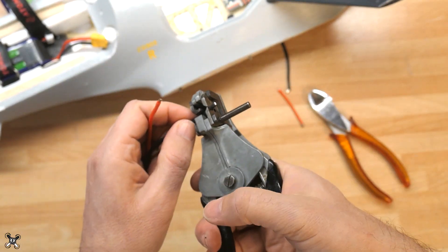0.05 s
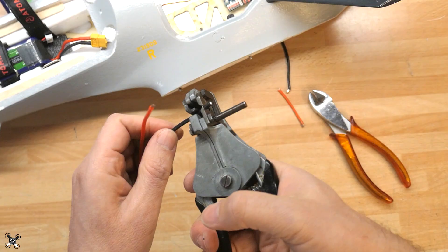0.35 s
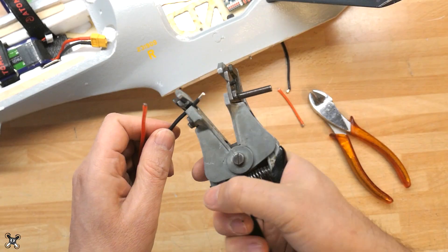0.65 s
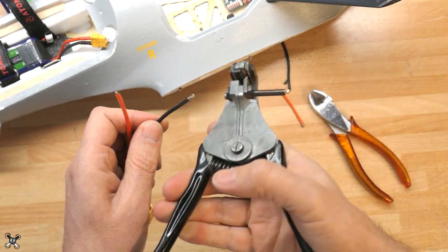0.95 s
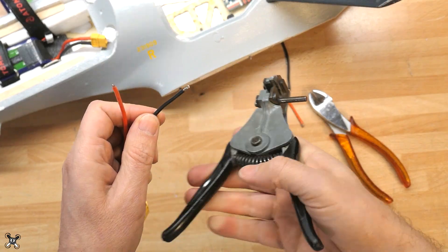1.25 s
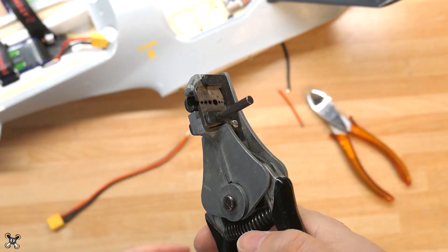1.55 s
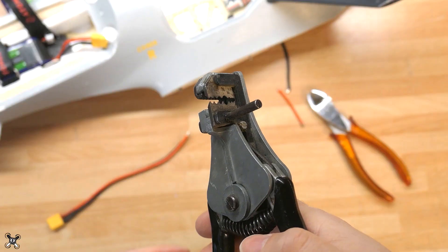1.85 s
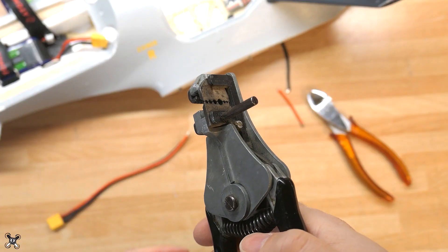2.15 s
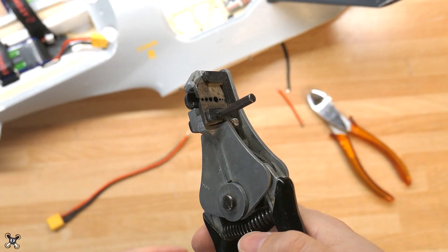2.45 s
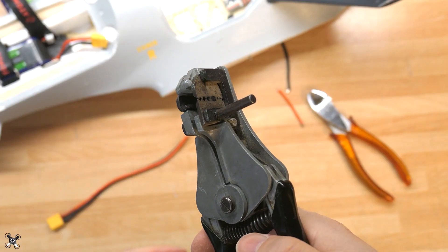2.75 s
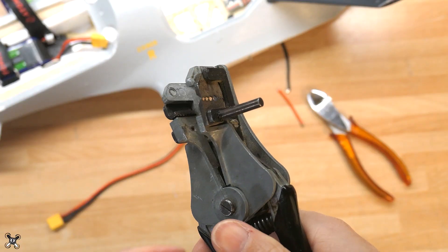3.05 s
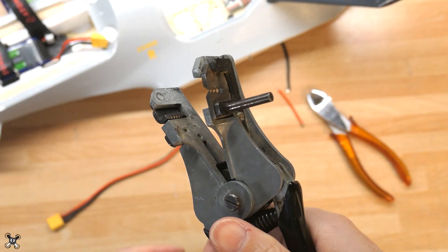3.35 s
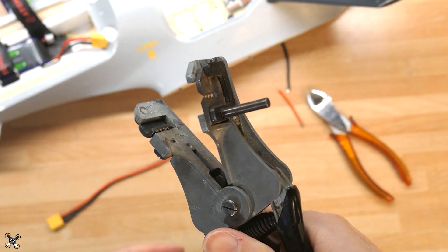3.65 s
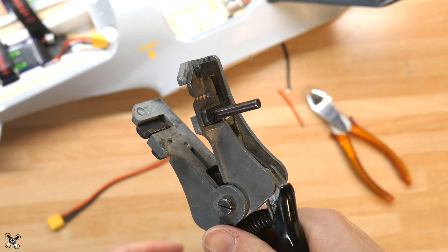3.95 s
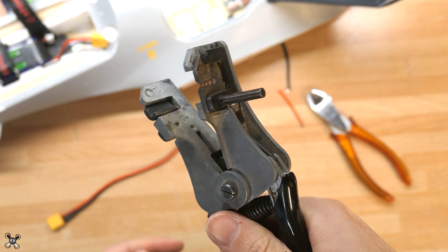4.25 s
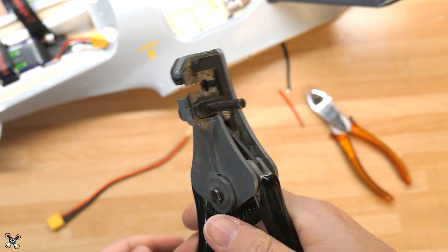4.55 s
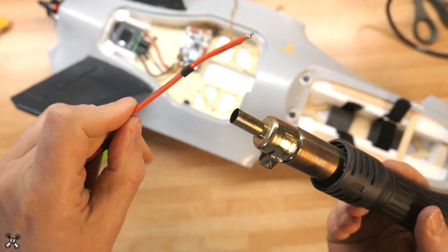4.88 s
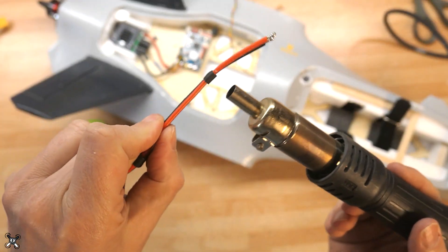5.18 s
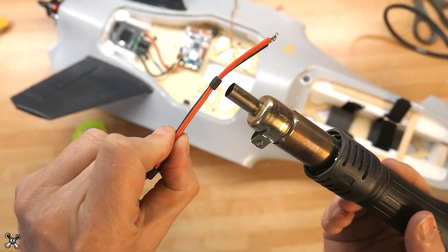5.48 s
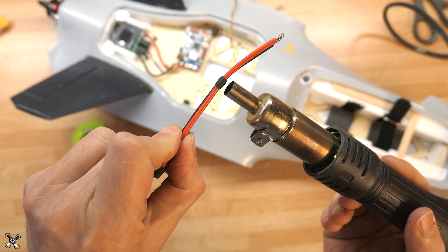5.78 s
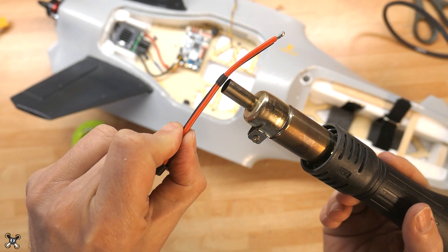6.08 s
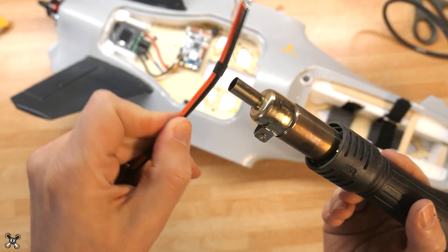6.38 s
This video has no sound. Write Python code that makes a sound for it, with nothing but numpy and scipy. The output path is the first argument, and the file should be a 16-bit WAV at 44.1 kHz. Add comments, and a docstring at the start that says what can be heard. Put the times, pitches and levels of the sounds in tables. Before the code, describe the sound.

A faint fan hums in a small workshop. At about 0.5 seconds a steel automatic wire stripper clicks close by as it grips a wire, then scrapes and cracks open with the loudest snap at 0.9 seconds. Light rattles and soft handle knocks follow between 1.2 and 1.7 seconds, with a few small clicks just after 2 seconds. A bright clink comes at 3.4 seconds, then quiet pivot ticks and a faint spring creak as the handles are squeezed. Around 4.4 and 4.6 seconds the tool lets go and springs shut in two sharp metallic clacks with a slight twang. At about 4.8 seconds the sound changes abruptly to a small heat gun, blowing a steady, hollow rush of air with faint thin whistles until the end, at around 6.6 seconds.

```python
"""A workshop with a wooden bench; a fan hums in the background. A steel automatic wire stripper grips,
scrapes, snaps open and springs shut: steel blows crack and ring, sliding faces stick and slip, the return
spring creaks and twangs. A gain control ducks the sound after the hardest snaps.
Then the scene changes: a small heat gun blows steadily on a heat-shrink sleeve, its jet rushing through
the barrel's resonances, with thin whistles from the nozzle."""
import sys
import numpy as np
from scipy import signal
from scipy.fft import rfft, irfft, next_fast_len
from scipy.io import wavfile
from scipy.ndimage import uniform_filter1d, minimum_filter1d, map_coordinates

SR = 44100
rng = np.random.default_rng(int(sys.argv[2]) if len(sys.argv) > 2 else 0)


def digitize_waveform(pressure):
    """Quantize a signal to 16-bit integers and store it at the path in sys.argv[1].

    Rows of a 2-D input are taken as channels; values are limited to [-1, 1].
    """
    field = np.atleast_2d(pressure).T
    bounded = np.clip(field, -1, 1)
    quanta = np.round(bounded * 32767).astype(np.int16)
    wavfile.write(sys.argv[1], SR, quanta)


N = 292054
SCENE_CHANGE_S = 4.763

# fan air noise (frequency [Hz], relative density [dB])
FAN_SPECTRUM = [(18, -63), (30, -24), (274, -3), (296, -6.5), (567, -8), (645, -0.5), (1270, -9),
                (2250, -17.5), (3230, -20), (12200, -20), (15000, -43)]
# fan stereo width (frequency [Hz], side re mid [dB])
FAN_WIDTH = [(60, 0), (110, 14), (200, 9.5), (380, 9.5), (700, 3.5), (1290, 4), (2380, 3.5), (4400, -3),
             (8120, -4.5), (15000, -7.5)]
# fan housing resonances (centre [Hz], width [Hz], boost [dB])
HOUSING_PEAKS = [(302, 8.9, 13), (438, 125, 1.5), (622, 42, 4.5), (733, 65, 2.5), (786, 45, -7),
                 (1053, 55, 9.5), (1208, 290, -4), (1620, 29, 6)]

# heat gun jet noise (frequency [Hz], relative density [dB])
JET_SPECTRUM = [(18, -74), (30, -43), (147, -20.5), (234, -18), (304, -6.5), (374, -9), (538, 0.5),
                (794, -8), (1370, -10), (1830, -15.5), (1970, -13), (3320, -13), (3880, -18.5),
                (9640, -25.5), (15000, -43)]
# jet stereo width (frequency [Hz], side re mid [dB])
JET_WIDTH = [(60, 17), (110, -6), (200, 9), (380, -6.5), (700, -6), (1290, -8.5), (2380, -9.5), (4400, -11),
             (8120, -10), (15000, -1)]
# heat gun balance (frequency [Hz], left re right [dB])
GUN_BALANCE = [(60, -1.5), (110, 4.5), (200, -4), (380, -2.5), (700, 0.5), (1290, 2), (2380, 2),
               (4400, 2.5), (8120, 0.5), (15000, 1)]
# barrel and nozzle resonances (centre [Hz], width [Hz], boost [dB])
BARREL_PEAKS = [(166.5, 31, 5), (305, 21, 3), (539, 17, 5.5), (570, 17, -3), (612, 25, 7), (682, 74, 3.5),
                (924, 20, 6), (1074, 20, 4), (1410, 235, 6.5), (2514, 18, 6.5), (2785, 140, 5.5),
                (3260, 55, 4), (3440, 290, 4.5), (4330, 90, 3), (5240, 570, -2.5), (6000, 1140, 4.5),
                (7200, 510, 2), (8100, 590, -3), (9600, 500, 1.5)]
# uneven level of the jet noise around 570 Hz (time [s], relative level [dB])
JET_BAND_LEVEL = [(4.78, -43.5), (4.814, -42.5), (4.944, -51), (5.0, -40.5), (5.04, -50.5), (5.096, -37),
                  (5.132, -54), (5.174, -37), (5.22, -50), (5.272, -39.5), (5.292, -46), (5.348, -42),
                  (5.374, -48), (5.446, -40.5), (5.542, -51), (5.574, -41.5), (5.716, -45.5), (6.28, -42.5),
                  (6.296, -44), (6.45, -47), (6.47, -49.5), (6.548, -44), (6.568, -42.5), (6.62, -45)]
# nozzle whistles (frequency [Hz], relative level [dB])
NOZZLE_WHISTLES = [(1233, -59), (1696, -55.5), (1852, -53)]
# whistle pitch creep (time [s], offset [cents])
WHISTLE_BEND = [(4.8, 1), (4.9, -2), (5.75, -2.5), (6.6, 10.5)]

# workshop reverb decay (frequency [Hz], t60 [s])
ROOM_DECAY = [(200, 0.3), (1200, 0.43), (2500, 0.48), (6500, 0.45), (10000, 0.4), (15000, 0.19)]
# workshop reverb colour (frequency [Hz], relative level [dB])
ROOM_SPECTRUM = [(200, -3), (700, -21), (1400, -5), (2300, 1), (6500, 0.2), (15000, 2.5)]

# spring rubbing under load (start [s], end [s], level [dB])
SPRING_CREAKS = [(0.803, 0.864, -61), (3.899, 4.172, -69)]
# return spring mode clusters (centre [Hz], relative level [dB])
SPRING_MODES = [(2400, -9), (2650, -2), (4470, 1), (4660, -1), (6030, 4), (6850, 1)]
# jolts of the spring (time [s], level [dB])
SPRING_TWANGS = [(4.383, -57), (4.5557, -54)]
# spring and pivot ticks (time [s], relative level [dB], ping [Hz], treble sheen [dB])
PIVOT_TICKS = [(0.6794, -42, 2200, -17), (2.505, -57, 2230, -17), (3.299, -54, 6060, 4),
               (3.4958, -49.5, 1900, -19), (3.5426, -44, 2120, -8), (3.606, -50, 1910, -16),
               (3.8984, -48.5, 2350, -14), (3.939, -52, 2500, -18), (3.997, -45.5, 2250, -8),
               (4.061, -50, 2380, -14), (4.089, -48.5, 2230, -17), (4.21, -51, 2400, 0)]
# handles shifting in the hand (time [s], level [dB], pitch [Hz])
HANDLE_KNOCKS = [(1.247, -53, 900), (1.301, -59.5, 1570), (1.4196, -56, 900), (1.421, -58, 1740),
                 (3.651, -60, 830), (3.71, -59, 930), (3.945, -60.5, 880), (4.105, -60, 760),
                 (4.193, -59.5, 970)]
# handles stopping on the palm (time [s], level [dB], push [Hz], push t60 [s], clack re push [dB])
PALM_THUMPS = [(0.5256, -33.5, 344, 0.023, -20), (0.528, -38, 463, 0.027, -20),
               (0.9225, -13, 344, 0.014, 9), (4.384, -41, 229, .028, 10), (4.5567, -35, 218, 0.037, 15)]
# gripping jaw modes (frequency [Hz], relative level [dB], t60 [s])
GRIPPER_MODES = [(1250, -20, .02), (2410, -8, .02), (3050, -13, .02), (5620, -3, .024), (8860, -7, .025),
                 (9850, -3, .025), (10450, -2, .025), (12700, -7, .02), (14500, -7, .02)]
# gripping jaw dropping onto its seat (time [s], level [dB])
GRIPPER_CLINKS = [(0.58, -27), (1.4522, -35), (3.365, -27.5)]
# broad jaw resonances (centre [Hz], width [Hz], boost [dB])
JAW_PEAKS = [(2390, 410, 1.5), (4060, 160, 6), (4490, 117, -2.5), (5470, 950, 3), (6570, 710, 2.5),
             (7800, 430, -0.5), (10150, 1100, 3)]
# steel frame mode clusters (centre [Hz], relative level [dB])
FRAME_MODES = [(1797, -14), (2400, -15), (2920, -7), (3980, -1.5), (4520, -9.5), (5650, -3.5), (6220, -13),
               (6800, -1.5), (7300, 6), (9100, 4.5), (10400, -2), (12600, -19), (14200, -15)]
# sliding steel noise (frequency [Hz], relative level [dB])
SCRAPE_SPECTRUM = [(60, -42), (300, -28), (1300, -11), (2300, -1), (4000, -9), (6500, -0.5), (8500, -6),
                   (15000, -5)]
# steel sliding to a stop (start [s], length [s], relative level [dB])
JAW_SCRAPES = [(0.517, 0.022, -42.5), (0.853, 0.041, -32.5), (0.914, 0.012, -17), (1.46, 0.044, -51),
               (1.613, 0.069, -50.5), (2.105, 0.048, -50.5), (4.3445, 0.033, -32), (4.543, 0.016, -16),
               (4.562, 0.018, -27)]
# steel on steel: grip, part, tear off the insulation, rattle, squeeze, let go, spring shut
# (time [s], level [dB], low knock [dB], treble sheen [dB], ping [Hz], ping re crack [dB], ping t60 [s])
JAW_BLOWS = [ (0.5226, -38.5, -7, -10, 6000, -15, .02), (0.5266, -36.5, -4, -12, 3400, -7, 0.023),
             (0.5427, -33.5, -14, -7, 9300, -5, 0.022), (.5803, -23.5, -19.5, 0.5, 2660, -15.5, 0.013),
             (0.8585, -28, -10, -3, 7500, -7, .015), (.862, -22.5, -16, -5, 7130, -1, 0.0074),
             (0.8793, -15.5, -24.5, -6, 5400, -17, .015), (.913, -22, -29, -7, 7300, 2, .015),
             (0.916, -14.5, -30, -17, 7290, -9, 0.016), (0.9224, -4.5, -10.5, -6, 7420, -15, .014),
             (1.4511, -29, -34, -7.5, 4670, -12, 0.014), (1.5094, -39.5, -9, -6.5, 12700, -8, .04),
             (1.5487, -36.5, -14, -2.5, 9140, 1.5, 0.036), (1.6108, -40, -28, -6, 6700, -6, .02),
             (1.6194, -38.5, -8, -4, 5870, 0.5, 0.019), (1.6989, -39, -17, -10.5, 6400, -23, .015),
             (2.079, -55, -10.5, -9, 6860, -13, .03), (2.128, -46, -6, -8, 6900, -7, 0.022),
             (2.138, -40.5, -8, -2, 7250, -10, .015), (2.2427, -52, -4, -14, 4840, -11, .015),
             (2.255, -52, -2.5, -14, 4700, -8, .015), (3.3641, -26, -16.5, 6.5, 5840, -7.5, 0.017),
             (4.3323, -43, 0, -3, 5970, -2, 0.048), (4.3503, -23.5, -7.5, 0, 2100, -8.5, 0.013),
             (4.365, -26, -22, 1, 12730, -8, .02), (4.3836, -16.5, -18, -2, 5900, -16, 0.012),
             (4.545, -23.5, -14, 3, 6500, -5, .02), (4.5482, -23, -17, -1, 6500, -1, .02),
             (4.5554, -9, -12.5, -2, 6640, -12, 0.018)]


def amp(db):
    """Decibels to gain."""
    return 10 ** (np.asarray(db) / 20)


def unit(x):
    """Scale to rms 1."""
    return x / np.sqrt(np.mean(x ** 2) + 1e-20)


def along(points, hz):
    """Interpolate (frequency [Hz], value) points on a log axis."""
    knots_hz, values = np.transpose(points)
    return np.interp(np.log(hz + 1), np.log(knots_hz + 1), values)


def curve(points):
    """Interpolate (time [s], value) points per sample."""
    return np.interp(np.arange(N) / SR, *np.transpose(points))


def bells(peaks, hz):
    """Sum of bell-shaped resonances."""
    return sum(height / (1 + (2 * (hz - centre) / width) ** 2) for centre, width, height in peaks)


def wobble(rate_hz):
    """Smooth random curve."""
    knots = rng.standard_normal(int(N * rate_hz / SR) + 4)
    return map_coordinates(knots, [np.arange(N) * rate_hz / SR])


def filtered(x, response):
    """Apply a frequency response."""
    n = x.shape[-1]
    size = next_fast_len(n + SR // 10)
    return irfft(rfft(x, size) * response(np.fft.rfftfreq(size, 1 / SR)), size)[..., :n]


def cluster(modes, width_hz, t60_s, t):
    """Close modes beating into a rough ring, energy 1."""
    peaks = [(hz, width_hz, amp(db)) for hz, db in modes]
    ring = filtered(rng.standard_normal(len(t)), lambda hz: bells(peaks, hz)) * amp(-60 * t / t60_s)
    return ring / np.linalg.norm(ring)


def air_noise(spectrum, peaks, width):
    """Stereo rush of air through resonances, mid at rms 1."""
    colour = lambda hz: amp(along(spectrum, hz) + bells(peaks, hz))
    mid, side = (unit(filtered(rng.standard_normal(N), colour)) for _ in range(2))
    side = filtered(side, lambda hz: amp(along(width, hz)))
    return np.array([mid + side, mid - side])


def air_tones(lines, drift_hz, flutter_db, glide=1):
    """Air-driven tones wavering in pitch and level."""
    waver = lambda hz: np.sin(2 * np.pi * np.cumsum(hz * glide + drift_hz * wobble(40)) / SR)
    return np.sqrt(2) * sum(amp(db + flutter_db * wobble(13)) * waver(hz) for hz, db in lines)


def fan(air_db=-60.5, waver_db=0.5, hum_hz=242, hum_db=-71, hold_s=0.78, fade_db_per_s=16):
    """Distant fan: air noise in a resonant housing, over a low hum that fades early."""
    air = amp(air_db + waver_db * wobble(5.594)) * air_noise(FAN_SPECTRUM, HOUSING_PEAKS, FAN_WIDTH)
    fade_db = fade_db_per_s * np.maximum(np.arange(N) / SR - hold_s, 0)
    return air + air_tones([(hum_hz, hum_db - fade_db)], drift_hz=7.1, flutter_db=1.5)


def bench_comb(hz, echo_db=-19, delay_range_s=(0.00199, 0.03), above_hz=1200, count=10):
    """Weak reflections from things on the bench ripple the treble."""
    delays_s = rng.uniform(*delay_range_s, (count, 1))
    echoes = amp(echo_db) * np.exp(-2j * np.pi * hz * delays_s).sum(axis=0)
    return 1 + echoes * hz ** 2 / (hz ** 2 + above_hz ** 2)


def uneven_band(jet, centre_hz=570, width_hz=280, flutter_db=0.7):
    """Uneven level of the jet noise around 570 Hz."""
    band = filtered(jet, lambda hz: bells([(centre_hz, width_hz, 1)], hz))
    level_db = curve(JET_BAND_LEVEL)
    return jet + band * (amp(level_db - level_db.mean() + flutter_db * wobble(26)) - 1)


def heat_gun(jet_db=-40.15, flutter_db=0.42, whistle_gain_db=-3, rise_db_per_s=1.5):
    """A hot jet rushes through the barrel and whistles at the nozzle."""
    jet = air_noise(JET_SPECTRUM, BARREL_PEAKS, JET_WIDTH)
    jet = uneven_band(filtered(jet, bench_comb))
    jet *= amp(jet_db + flutter_db * wobble(25))
    blowing_s = np.arange(N) / SR - SCENE_CHANGE_S
    glide = 2 ** (curve(WHISTLE_BEND) / 1200)
    whistles = air_tones(NOZZLE_WHISTLES, drift_hz=4, flutter_db=-0.5, glide=glide)
    whistles *= amp(whistle_gain_db + rise_db_per_s * blowing_s)
    return filtered(jet + whistles, lambda hz: amp(np.outer([0.5, -0.5], along(GUN_BALANCE, hz))))


def in_room(x, late_db=-12, early_db=-12, early_t60_s=0.058, gap_s=0.003, side_db=-6,
            spread_db=-14, spread_hz=9000):
    """Direct sound, early bench reflections and workshop reverb, in stereo."""
    hz, frame_s, noise = signal.stft(rng.standard_normal((2, SR // 2)), SR, nperseg=256)
    decay_db = along(ROOM_SPECTRUM, hz)[:, None] - 60 * frame_s / along(ROOM_DECAY, hz)[:, None]
    late = signal.istft(noise * amp(decay_db), SR, nperseg=256)[1]
    t = np.arange(late.shape[1]) / SR
    early = rng.standard_normal(late.shape) * amp(-60 * t / early_t60_s)
    echoes = sum(amp(db) * ir / np.linalg.norm(ir[0]) for db, ir in [(late_db, late), (early_db, early)])
    echoes = np.pad(echoes, ((0, 0), (round(gap_s * SR), 0)))
    mid, side = signal.fftconvolve(x[None], echoes, axes=1)
    mid[:len(x)] += x
    side *= amp(side_db)
    # short waves arrive slightly out of step left and right
    skew = filtered(x, lambda hz: 1j * hz / spread_hz)
    side[:len(x)] += rng.choice([-1, 1]) * amp(spread_db) * skew
    return mid + side, mid - side


def spring_creak(rub_hz=2300, rub_width_hz=700, rasp_hz=6000, rasp_width_hz=2500, rasp_db=-13,
                 uneven_db=3):
    """The return spring rubs softly as the handles are squeezed."""
    t = np.arange(N) / SR
    swell = sum(amp(db) * np.sin(np.pi * np.clip((t - start_s) / (end_s - start_s), 0, 1))
                for start_s, end_s, db in SPRING_CREAKS)
    bands = [(rub_hz, rub_width_hz, 1), (rasp_hz, rasp_width_hz, amp(rasp_db))]
    rub = unit(filtered(rng.standard_normal(N), lambda hz: bells(bands, hz)))
    return swell * amp(uneven_db * wobble(70)) * rub


def spring_twang(db, width_hz=420, t60_s=0.97):
    """The return spring shivers on after the handles stop."""
    return amp(db) * unit(cluster(SPRING_MODES, width_hz, t60_s, np.arange(SR // 2) / SR))


def handle_knock(db, hz, t60_s=0.053, attack_s=0.0015):
    """Dull, padded contact with no crack."""
    t = np.arange(SR // 8) / SR
    body = (1 - np.exp(-t / attack_s)) * cluster([(hz, 0)], 0.5 * hz, t60_s, t)
    return amp(db) * body / np.sqrt(np.mean(body[:SR // 100] ** 2))


def palm_thump(db, push_hz, push_t60_s, clack_db, clack_hz=1030, clack_t60_s=0.0074, attack_s=0.0012):
    """Short push and hollow clack, both damped by the hand."""
    t = np.arange(SR // 10) / SR
    push = amp(-60 * t / push_t60_s) * np.sin(2 * np.pi * push_hz * t)
    clack = amp(clack_db - 60 * t / clack_t60_s) * np.sin(2 * np.pi * clack_hz * t)
    return amp(db) * (1 - np.exp(-t / attack_s)) * (push + clack)


def gripper_clink(db, attack_s=0.00051, scatter_db=4.5):
    """Clean modes of the gripping jaw, soon damped by its seat."""
    t = np.arange(SR // 10) / SR
    ring = sum(amp(mode_db + rng.normal(0, scatter_db) - 60 * t / t60_s)
               * np.sin(2 * np.pi * (hz * t + rng.random())) for hz, mode_db, t60_s in GRIPPER_MODES)
    return amp(db) * (1 - np.exp(-t / attack_s)) * ring


def jaw_scrape(length_s, slips_per_s=3500, slip_t60_s=0.0044, swell_s=0.0044):
    """Steel sticks and slips: a dense run of tiny, uneven cracks."""
    t = np.arange(SR // 8) / SR
    slips = (rng.random(len(t)) < slips_per_s / SR) * rng.uniform(0.52, 1, len(t)) * (t < length_s)
    slips *= 1 - np.exp(-t / swell_s)
    envelope = signal.fftconvolve(slips, amp(-60 * t / slip_t60_s))[:len(t)]
    grit = envelope * rng.standard_normal(len(t))
    grit = filtered(grit, lambda hz: amp(along(SCRAPE_SPECTRUM, hz) + bells(JAW_PEAKS, hz)))
    return grit * np.sqrt(length_s * SR) / np.linalg.norm(grit)


def steel_contact(db, knock_db, bite_db, sheen_db, ping_hz, ping_db, ping_t60_s, ping_width_hz=520,
                  attack_s=0.0012, crack_t60_s=0.0073, chatter_db=-19, chatter_t60_s=0.05, ring_db=-24):
    """One blow: sharp crack, chatter of loose joints, ping of the struck part, ring of the frame."""
    t = np.arange(SR // 4) / SR
    rise = 1 - np.exp(-t / attack_s)
    envelope = rise * (amp(-60 * t / crack_t60_s) + amp(chatter_db - 60 * t / chatter_t60_s))
    # (frequency [Hz], relative level [dB])
    colour = [(30, knock_db - 33.5), (110, knock_db - 12.5), (260, knock_db + 4.5),
              (430, knock_db + 0.5), (1200, knock_db + 0.5), (1650, (knock_db + bite_db) / 2 - 4.5),
              (2300, bite_db - 10.5), (3400, bite_db - 10), (4400, -3.5), (7200, -0.5),
              (8500, sheen_db), (15000, sheen_db - 0.5)]
    burst = envelope * rng.standard_normal(len(t))
    crack = filtered(burst, lambda hz: amp(along(colour, hz) + bells(JAW_PEAKS, hz)))
    crack /= np.sqrt(np.mean(crack[:SR // 300] ** 2))
    ping = rise * cluster([(ping_hz, 0)], ping_width_hz, ping_t60_s, t)
    ping *= amp(ping_db) / np.linalg.norm(ping)
    ring = amp(ring_db) * cluster(FRAME_MODES, width_hz=300, t60_s=0.33, t=t)
    return amp(db) * (crack + np.linalg.norm(crack) * (ping + ring))


def pivot_tick(db, ping_hz, sheen_db):
    """Light contact in a loaded pivot or the spring."""
    return steel_contact(db, knock_db=0, bite_db=10, sheen_db=sheen_db, ping_hz=ping_hz, ping_db=-1,
                         ping_t60_s=0.024, ping_width_hz=650, chatter_db=-25.5)


def jaw_blow(db, knock_db, sheen_db, *ping):
    """Steel hits steel; harder, heavier blows bite more at 2-3 kHz."""
    bite_db = 7.5 + 0.22 * knock_db + 0.087 * db
    return steel_contact(db, knock_db, bite_db, sheen_db, *ping)


def wire_stripper(scrape_gain_db=-1, tick_gain_db=-8):
    """Impacts, scrapes and twangs of the tool, each with its own echoes."""
    sounds = [(s, jaw_blow(*blow)) for s, *blow in JAW_BLOWS]
    sounds += [(s, amp(db + scrape_gain_db) * jaw_scrape(length_s)) for s, length_s, db in JAW_SCRAPES]
    sounds += [(s, pivot_tick(db + tick_gain_db, hz, sheen_db)) for s, db, hz, sheen_db in PIVOT_TICKS]
    sounds += [(s, handle_knock(db, hz)) for s, db, hz in HANDLE_KNOCKS]
    sounds += [(s, palm_thump(*thump)) for s, *thump in PALM_THUMPS]
    sounds += [(s, spring_twang(db)) for s, db in SPRING_TWANGS]
    pairs = [(s, in_room(sound)) for s, sound in sounds]
    pairs += [(s, in_room(gripper_clink(db), late_db=-23)) for s, db in GRIPPER_CLINKS]
    mix = np.zeros((2, N))
    for start_s, pair in pairs:
        for track, sound in zip(mix, pair):
            span = track[round(start_s * SR):][:len(sound)]
            span += sound[:len(span)]
    return mix


def gain_control(x, limit_db=-18.5, hold_s=0.13, release_db_per_s=65):
    """Loud snaps pull the gain down at once; it holds, then climbs back."""
    power = uniform_filter1d(np.mean(x ** 2, axis=0), size=SR // 80)
    level_db = 10 * np.log10(np.abs(power) + 1e-12)
    span = int(hold_s * SR)
    held_db = minimum_filter1d(np.minimum(limit_db - level_db, 0), span, origin=(span - 1) // 2)
    climb_db = release_db_per_s * np.arange(N) / SR
    return x * amp(np.minimum.accumulate(held_db - climb_db) + climb_db)


def scene(fade_s=0.0067):
    """Stripper and fan, a quick fade out and in, then the heat gun."""
    ramp = (np.arange(N) / SR - SCENE_CHANGE_S) / fade_s
    bench = gain_control(wire_stripper() + spring_creak() + fan())
    return np.clip(-ramp, 0, 1) * bench + np.clip(ramp, 0, 1) * heat_gun()


def record(dry):
    """Steep low-pass at 15.9 kHz."""
    return filtered(dry, lambda hz: 1 / (1 + (hz / 15900) ** 120))


dry = scene()
out = record(dry)
digitize_waveform(out)
```